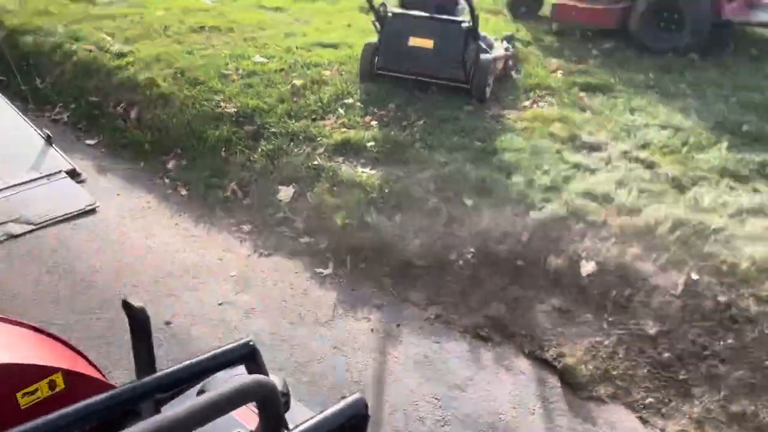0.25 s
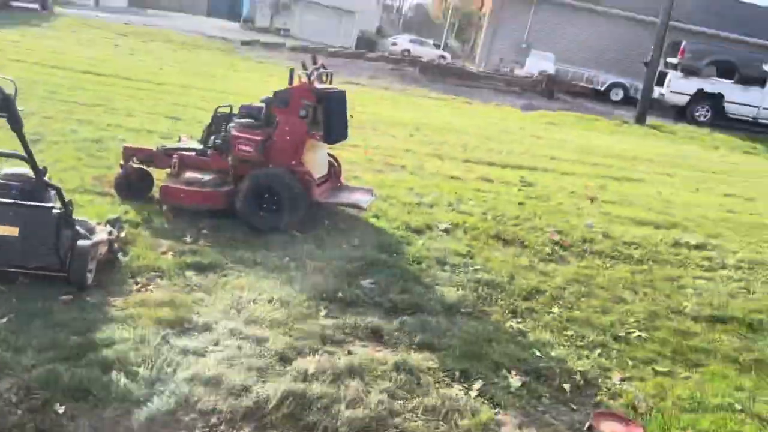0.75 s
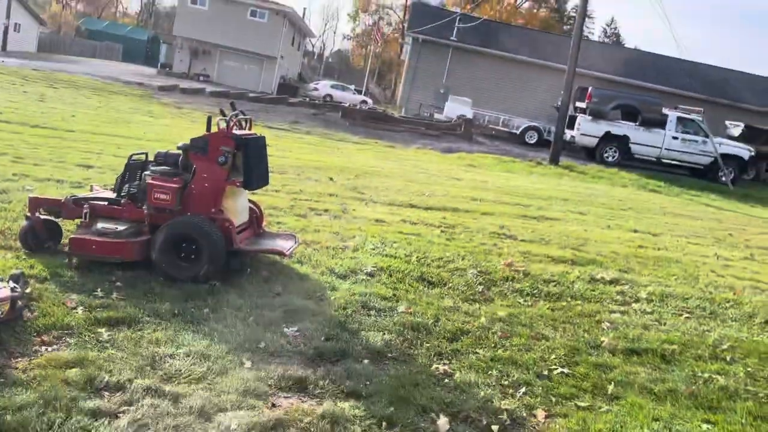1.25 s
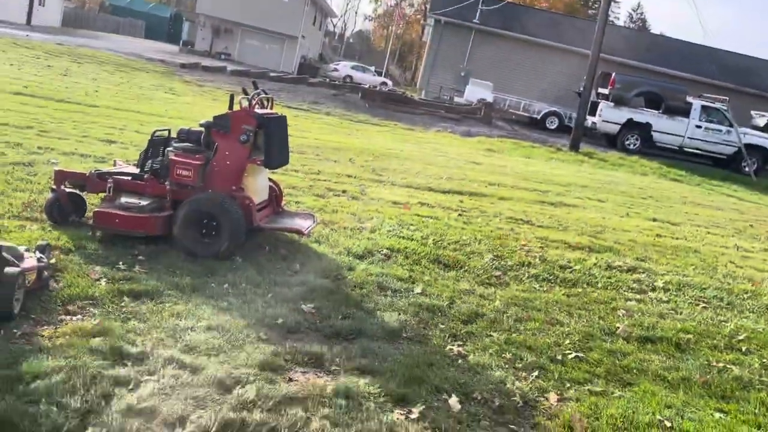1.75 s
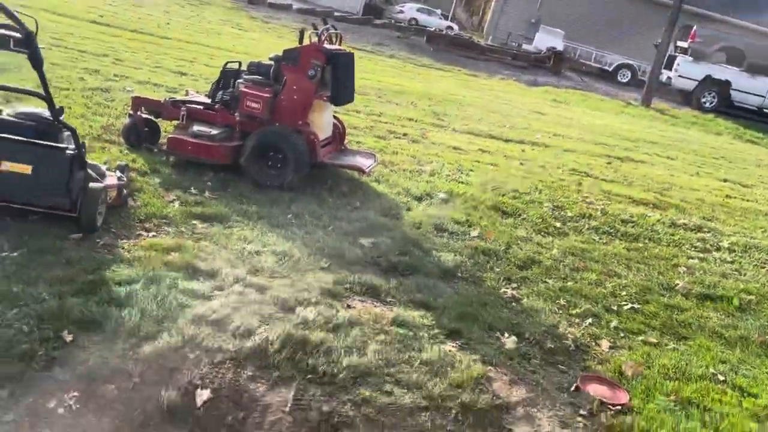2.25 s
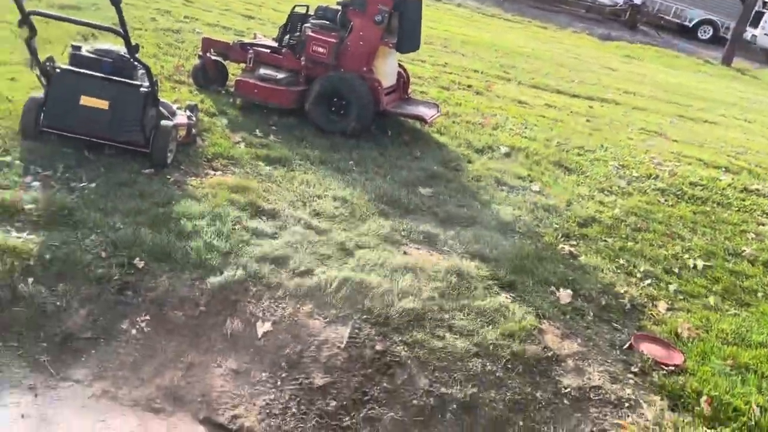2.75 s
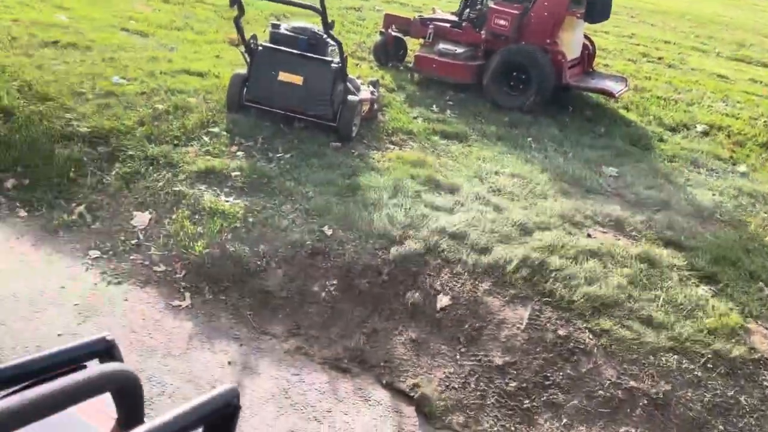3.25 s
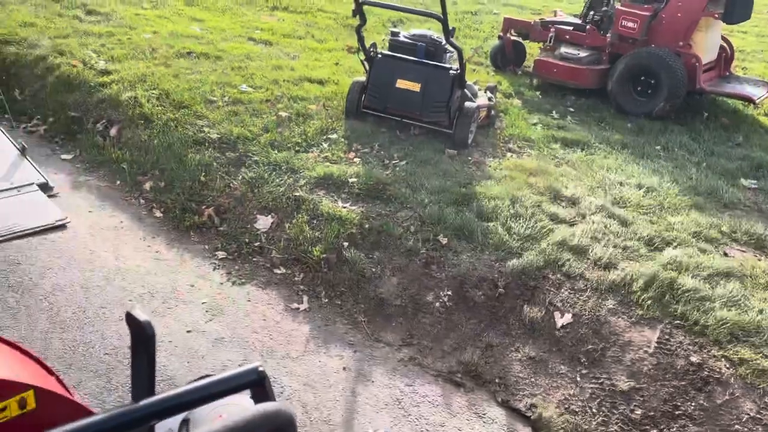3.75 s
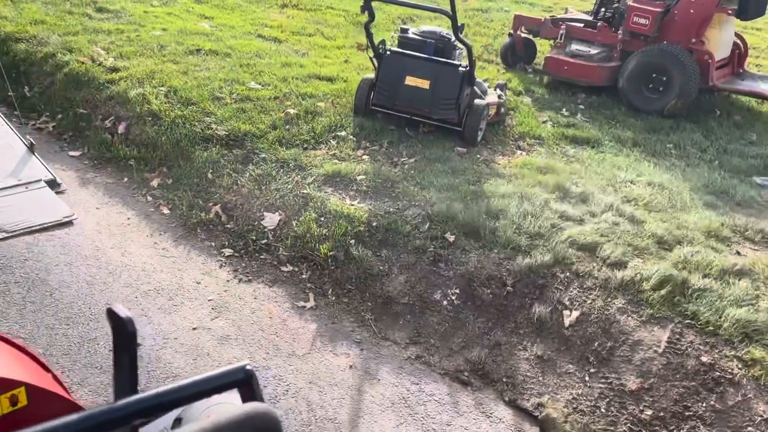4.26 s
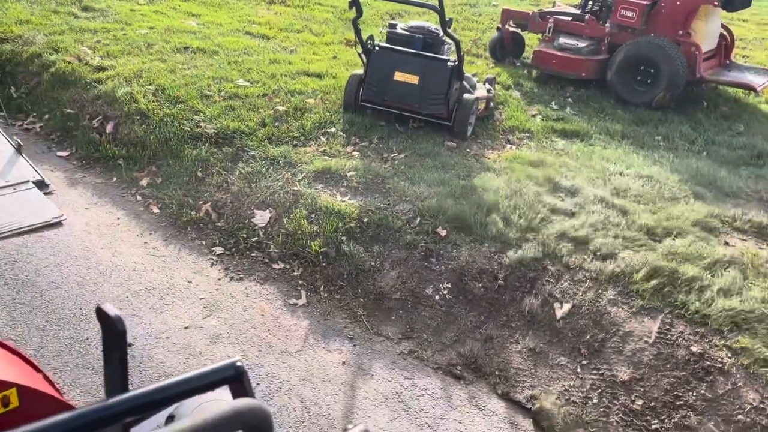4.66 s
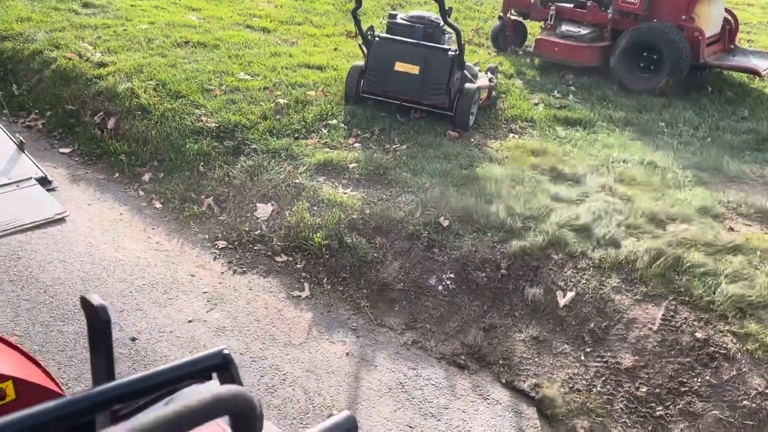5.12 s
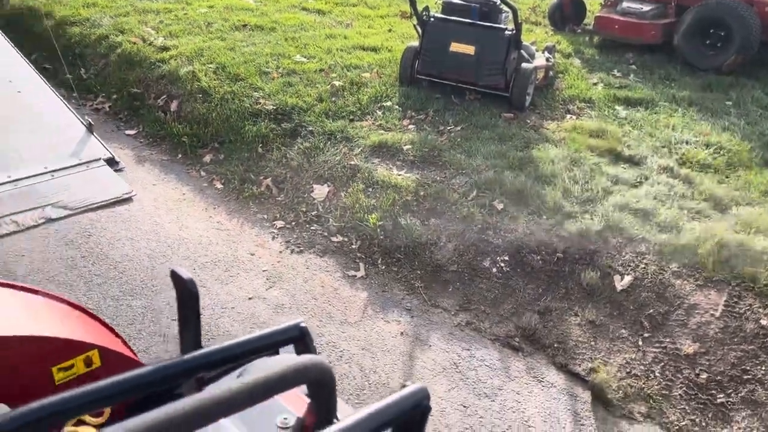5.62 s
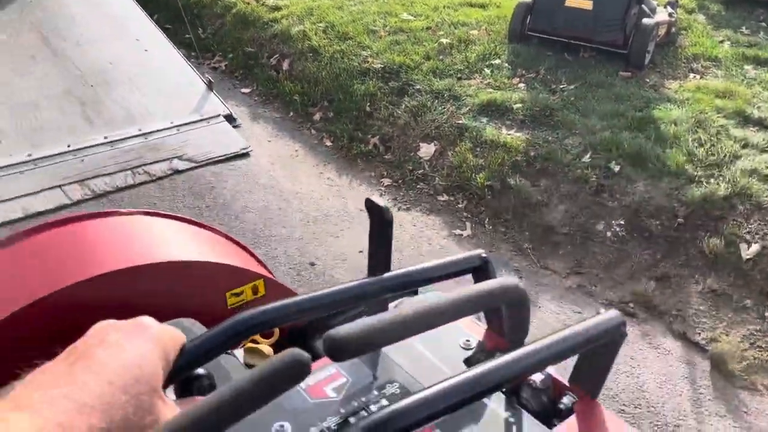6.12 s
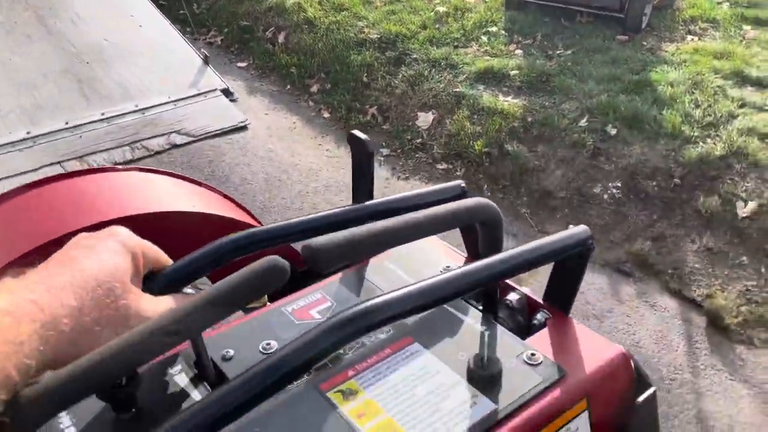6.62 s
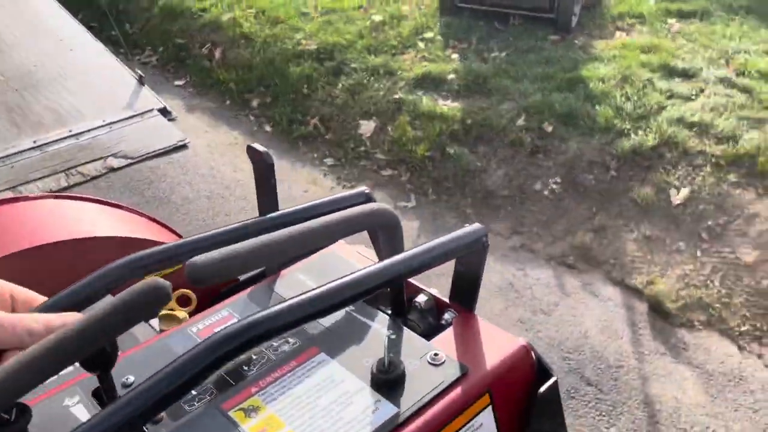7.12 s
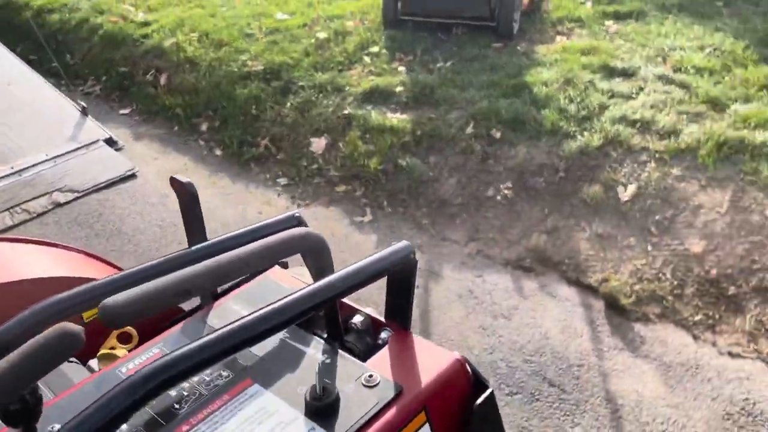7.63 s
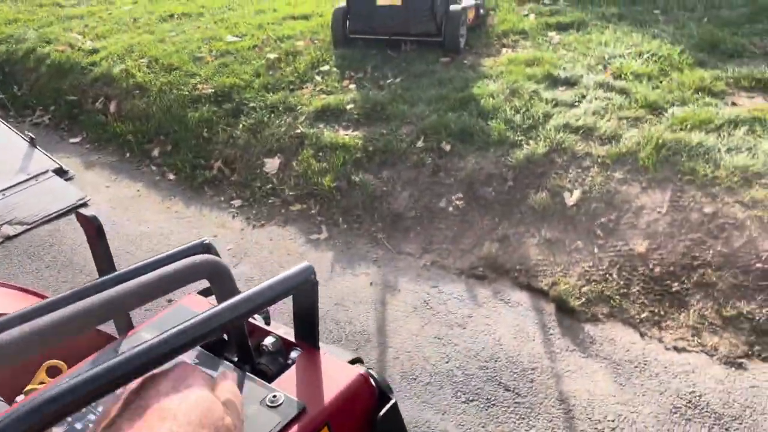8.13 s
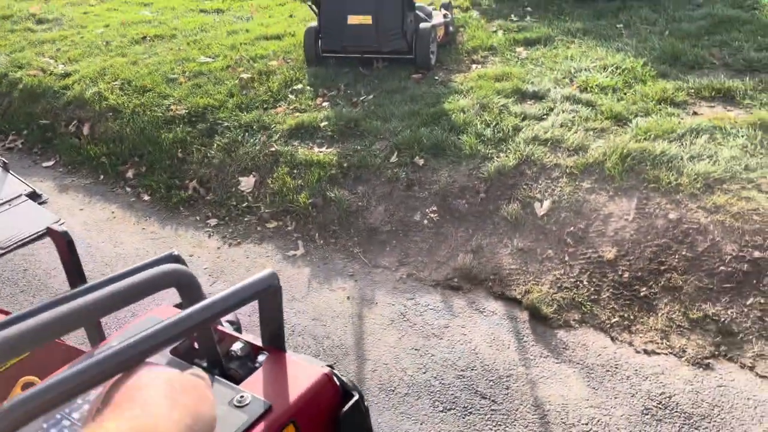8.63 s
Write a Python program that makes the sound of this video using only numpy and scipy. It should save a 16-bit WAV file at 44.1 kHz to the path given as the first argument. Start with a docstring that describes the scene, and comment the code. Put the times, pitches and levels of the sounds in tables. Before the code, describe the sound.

Close by outdoors, a large engine-driven blower throbs with rushing air and fan whine, briefly races brighter, then winds down lower and quieter.

```python
"""Rushing air and a throbbing exhaust come first, with the whine of a six-blade fan: a stand-on leaf blower
with a V-twin petrol engine on a driveway, heard from the driver's place by a two-port microphone.
The fan is a stack of sines that flare in housing resonances; exhaust lines and hum are sines, while muffler
puffs, air, jet and valve ticks are coloured noise, all timed by one crankshaft. After five seconds the load
eases: the fan speeds up and its tone swells; then the throttle is pulled back and the pitch sinks."""
import sys
import numpy as np
from scipy import signal
from scipy.fft import rfft, irfft
from scipy.io import wavfile
from scipy.ndimage import uniform_filter1d

SR = 44100
rng = np.random.default_rng(int(sys.argv[2]) if len(sys.argv) > 2 else 0)


def generate_wav(signal):
    """Clip the signal to [-1, 1] and save it as 16-bit WAV at the path in sys.argv[1]."""
    frames = np.transpose(np.atleast_2d(signal))
    scaled = np.clip(frames, -1, 1) * 32767
    pcm = np.round(scaled).astype(np.int16)
    wavfile.write(sys.argv[1], SR, pcm)


N = 391608
TIME = np.arange(N) / SR
BINS = np.fft.rfftfreq(N, 1 / SR)
BLADES = 6
VEE = 3 / 8  # share of the four-stroke cycle between the two cylinders

# blade-pass tone: [t/s, level/dB]
TONE_LEVEL = [(0, -24.5), (0.8, -31), (3.5, -21), (4.75, -29), (5, -15.5), (5.25, -10), (5.85, -13.5),
              (6.3, -12), (6.85, -15.0), (7.15, -23.5), (7.55, -23), (7.75, -18.5), (8.1, -21), (8.88, -19)]
# lean of that tone before it reaches the ports: [t/s, left minus right level/dB]
TONE_LEAN = [(0, 3), (2.9, 6), (3.4, 4), (4.5, 8), (5.1, 0.5), (8.88, -1)]
# the fan's octave: [t/s, level/dB]
OCTAVE_LEVEL = [(0, -26.5), (0.9, -46), (2.7, -35), (3.3, -26.5), (5.2, -25), (5.55, -57), (6.3, -35.5),
                (6.8, -37), (6.97, -28), (7.12, -47), (8.3, -37.5), (8.88, -38)]
# whine above the octave, before harmonic balance and housing: [t/s, level/dB]
WHINE_LEVEL = [(0.0, -37.5), (0.8, -41), (1.8, -39.1), (2.4, -33), (4.0, -34.5), (4.8, -37.5), (5.0, -33.5),
               (5.1, -27.5), (5.4, -29), (5.48, -25.5), (5.72, -25.2), (5.8, -32.5), (6.3, -33.5),
               (6.72, -34.5), (6.88, -34), (7.12, -33), (7.3, -44), (7.8, -41), (8.3, -42), (8.88, -39.5)]
# how the machine is running: [t/s, stage: 0 pulling, 1 racing, 2 running down, 3 idling]
RUNNING_STAGE = [(4.95, 0), (5.15, 1), (6.67, 1), (6.79, 2), (7.2, 2), (7.4, 3)]
# balance of the blades' harmonics as the airflow changes:
# [harmonic number, level/dB pulling, level/dB racing, level/dB running down, level/dB idling]
HARMONIC_BALANCE = [(3, 12, -0.5, 0.5, 13), (4, -19, -5.5, -5.5, 7.5), (5, 2, 2, 4.5, -1),
                    (6, 1, 0.5, 5, 4), (7, 0.5, 1, -4, 8), (8, -2, -1.5, -4, -1), (9, -2.5, -1.5, -3, -1.5),
                    (10, -0.5, -4.5, -0.5, 1), (11, -3.5, 0, -2, -2), (12, 0, 0, -3, -1.5),
                    (13, 2, 2.5, -4, 2), (14, 2, 1, -1, -4), (15, -7.5, 2, -2, -4), (16, -10, -3, -5, -8)]
# how deeply the upper harmonics come and go: [stage, depth/dB]
FADING_DEPTH = [(0, 1.2), (1, 1.5), (2, 2), (3, 3.8)]


def fan(cycle):
    """Blades chop the air at the housing lip; turbulence roughens harmonics that flare in the housing."""
    flutter, fuzz = 0.065, 0.16  # shares of the tone's level; of the harmonics' level and phase (rad)
    scatter = 0.29  # phase drift, opposite at the two ports (rad)
    angle = 2 * np.pi * 2 * BLADES * cycle
    blade_hz = BLADES * crank_speed()

    lean = amp(np.array([[.5], [-.5]]) * follow(TONE_LEAN))
    lean = lean / np.sqrt((lean ** 2).mean(0))  # leaning keeps the power
    tone = amp(follow(TONE_LEVEL)) * (1 + flutter * drift(rate_hz=35)) * np.cos(angle)
    out = tone * lean

    whine_db = follow(WHINE_LEVEL)
    stage = follow(RUNNING_STAGE)
    wander_db = np.interp(stage, *np.transpose(FADING_DEPTH))
    heights = [amp(follow(OCTAVE_LEVEL))]
    for k, *stage_db in HARMONIC_BALANCE:
        db = whine_db + np.interp(stage, np.arange(len(stage_db)), stage_db)
        depth_db = wander_db * min(k / 10, 1)  # the low harmonics are the steadiest
        fading = amp(depth_db * (drift(rate_hz=13) - 1 / 2))
        heights.append(amp(db) * housing(k * blade_hz) * fading)

    for k, height in enumerate(heights, 2):
        phase = k * angle + 2 * np.pi * rng.random() + fuzz * drift(rate_hz=27)
        spread = scatter * drift(rate_hz=3.9) * np.array([[1], [-1]])
        out += height * (1 + fuzz * drift(rate_hz=19)) * np.cos(phase + spread)
    return np.sqrt(2) * out


# narrow resonances of the fan housing: [f/Hz, width/Hz, level/dB]
HOUSING_MODES = [(829, 25, -7.5), (892, 13, 2), (1063, 18, -4), (1131, 54, 0), (1343, 68, 5.5),
                 (1434, 10, -1.5), (1510, 62, -0.5), (1678, 68, -3), (1776, 15, -0.5), (1795, 35, -11),
                 (1870, 15, -16), (2087, 57, -2), (2152, 18, -2.5), (2200, 200, -9.5), (2435, 16, -3.5),
                 (2634, 76, -7.5), (2738, 44, -5), (2866, 42, -2), (3100, 85, -15), (3400, 85, -12),
                 (3610, 80, -14.5), (3770, 38, -12), (4150, 100, -17), (4290, 60, -23), (4570, 19, -18),
                 (4940, 40, -19.5), (5287, 330, -31), (5630, 43, -19.5)]


def housing(hz):
    """Resonances add their powers; gives the gain at the frequencies hz."""
    grid = np.arange(0, SR / 2, 2)
    power = sum(amp(db) ** 2 / (1 + (2 * (grid - f) / width) ** 2) for f, width, db in HOUSING_MODES)
    return np.interp(hz, grid, np.sqrt(power))


# exhaust lines, relative to the exhaust level:
# [multiple of the cycle rate, level/dB pulling, level/dB running light, level/dB throttle shut]
FIRING_LINES = [(3, -15, -22, -5.5), (4, -21, -33, -14), (5, -13.5, -5.5, -21.5), (6, -6, -18.5, -13),
                (7, -7.5, -18.5, -13.5), (8, -7.5, -11.5, -7.5), (9, -15, -22, -9), (10, -16, -23, -12),
                (11, -25.5, -15, -23), (13, -45, -21.5, -24), (14, -40, -23.5, -24)]
# colour of the muffler noise: [f/Hz, relative level/dB per Hz]
MUFFLER_COLOUR = [(20, -40), (45, -18.5), (100, -7.5), (125, -7), (160, -2.5), (215, 3.5), (260, 2.5),
                  (305, -4), (375, -1.5), (440, -16), (700, -43)]
# how exhaust and hum follow the roar:
# [level/dB, dB per dB of roar, dB added running light, dB added throttle shut]
EXHAUST_FOLLOWS = (-19.5, 0.99, 0.05, 1)
HUM_FOLLOWS = (-26.5, 1, 0.5, -7.5)
# the hum fades as the crankshaft slows: [speed/(turns/s), added level/dB]
HUM_FADE = [(46, -4.5), (55, -0.5)]


def exhaust(cycle):
    """Two unevenly spaced firings a cycle give lines and puffs of muffler noise; each crank turn hums."""
    uneven, hum_waver = 0.11, 0.053  # shares of the level that wander
    far_cylinder = 0.68  # strength of the weaker cylinder in the lines
    smear = 0.73  # random phase offset of each line (rad, rms)
    throb, throb_width, second = 0.66, 0.15, 0.13  # puff height, width (cycles), share of the second puff
    load = follow(ENGINE_LOAD)
    pulling, shut = np.clip(load, 0, 1), np.clip(-load, 0, 1)

    strength, lines = 1 + uneven * drift(rate_hz=42), np.zeros(N)
    for k, pulling_db, light_db, shut_db in FIRING_LINES:
        # the lag between the cylinders sets the phase of their sum
        pair = np.angle(1 + far_cylinder * np.exp(2j * np.pi * k * VEE))
        db = light_db + pulling * (pulling_db - light_db) + shut * (shut_db - light_db)
        height = amp(db) * (strength + uneven * drift(rate_hz=2.6))
        lines += height * np.cos(2 * np.pi * k * cycle + pair + smear * rng.standard_normal())

    pair_of_puffs = burst(cycle, 0, throb_width) + second * burst(cycle, -VEE, throb_width)
    roar = amp(-2.5) * unit(1 + throb * pair_of_puffs) * noise(MUFFLER_COLOUR)

    hum_db = level(HUM_FOLLOWS) + np.interp(crank_speed(), *np.transpose(HUM_FADE))
    hum = amp(hum_db) * (1 + hum_waver * drift(rate_hz=14)) * np.cos(2 * np.pi * 2 * cycle)
    return amp(level(EXHAUST_FOLLOWS)) * (np.sqrt(2) * lines + roar) + np.sqrt(2) * hum


def burst(cycle, at, width):
    """A smooth bump once in every engine cycle."""
    return np.exp(-.5 * (((cycle - at + .5) % 1 - .5) / width) ** 2)


# colours of the air in the housing and at the nozzle: [f/Hz, relative level/dB per Hz]
RUSH_COLOUR = [(200, -17.5), (420, -4.5), (520, -0.5), (620, 1), (760, 0), (1050, -3.5), (1280, -0.5),
               (1650, -10), (2000, -12.5), (3000, -37.5)]
HISS_COLOUR = [(1000, -34), (1600, 3.5), (1950, 0.5), (2350, 1), (2700, -2), (3100, -4), (3550, -5),
               (4300, -10), (5200, -11.5), (6200, -13), (7400, -16), (9000, -33), (12000, -51),
               (16000, -40)]
# how rush (before its trim) and hiss follow the roar:
# [level/dB, dB per dB of roar, dB added running light, dB added throttle shut]
RUSH_FOLLOWS = (-24, 1, 0, -0.5)
HISS_FOLLOWS = (-32, 1.15, 4.5, 3.5)


def air(cycle):
    """Turbulent air rushes through the housing and hisses out of the nozzle, chopped by the blades."""
    rush_trim_db, gust_db = 1.0, 1.23
    chop = 0.15  # depth of the blades' chopping, as a share
    with_whine = 0.13  # dB the hiss swells per dB of whine
    whine_db = follow(WHINE_LEVEL)
    swell_db = with_whine * (whine_db - whine_db.mean())
    blades = unit(1 + chop * np.cos(2 * np.pi * 2 * BLADES * cycle))
    rush_db = level(RUSH_FOLLOWS) + rush_trim_db + gust_db * drift(rate_hz=14)
    rush = amp(rush_db) * noise(RUSH_COLOUR)
    hiss_db = level(HISS_FOLLOWS) + swell_db + gust_db * drift(rate_hz=33)
    hiss = amp(hiss_db) * noise(HISS_COLOUR)
    return blades * (rush + hiss)


# colour of the jet at the nozzle: [f/Hz, relative level/dB per Hz]
JET_COLOUR = [(600, -28), (880, 8), (1080, -10.5), (1400, -22.5), (1750, -11.5), (1950, 2.5), (2400, 3.5),
              (2700, -2.5), (3100, -32)]
# how the jet follows the roar, with the microphone on the lawn:
# [level/dB, dB per dB of roar, dB added running light, dB added throttle shut]
JET_FOLLOWS = (-33.5, 1.4, -1.5, 5)


def jet(cycle):
    """The jet tears at the air in gusts, throbbing once a cycle, as the microphone turns to the lawn."""
    gust_db, throb = 0.5, .35  # gust depth (dB rms), throb depth (share)
    pulses = unit(1 + throb * np.cos(2 * np.pi * cycle))
    gain = amp(level(JET_FOLLOWS) + gust_db * drift(rate_hz=50))
    return follow(MIC_AIM) * pulses * gain * noise(JET_COLOUR)


# colour of the valve gear: [f/Hz, relative level/dB per Hz]
VALVE_COLOUR = [(1500, -17), (3200, -1.5), (4300, -5.5), (6000, -3.5), (7300, -1.5), (8600, 2),
                (9500, -1.5), (10700, -6), (12000, -6), (13300, -9.5), (14500, -5), (16000, -11.5)]
# valve gear before its trim: [t/s, level/dB]
VALVE_GEAR_LEVEL = [(0, -40.5), (0.85, -53), (1.7, -49), (2.3, -44), (3.4, -39), (5.6, -43), (5.85, -47.5),
                    (6.7, -46.5), (7.0, -70), (7.42, -77), (7.55, -54.5), (7.8, -47.5), (8.0, -47.5),
                    (8.4, -62), (8.88, -82)]


def valves(cycle):
    """Valve gear ticks sharply on one cylinder and rasps on the other, with a closing tap, over a sizzle."""
    trim_db, vary_db = 2.0, 1.1  # level trim; rms spread of tick sizes
    main, second, second_width = 4.1, 0.59, 0.048  # tick and rasp heights against the sizzle; width (cycles)
    closing, closing_at = 0.37, 0.22  # tap height, and its place in the cycle
    light_boost, second_boost = 1.9, 2.0  # gains reached at low speed
    number = np.floor(cycle + 1 / 2).astype(int)
    size = amp(vary_db * rng.standard_normal((2, 512)))[:, number % 512]
    idling = np.interp(crank_speed(), [46, 54], [1, 0])  # by turns per second
    slow = light_boost ** idling
    rasp = second * second_boost ** idling * burst(cycle, -VEE, second_width)
    tap = closing * knock(cycle, closing_at)
    ticks = main * size[0] * knock(cycle, 0) + size[1] * (rasp + tap)
    shape = unit(1 / slow + slow * ticks)  # at low speed the ticks stand out from the sizzle
    return amp(follow(VALVE_GEAR_LEVEL) + trim_db) * shape * noise(VALVE_COLOUR)


def knock(cycle, at):
    """A quick rise and a slower fall once in every engine cycle, peak 1."""
    rise, fall = .02, .06  # shares of the engine cycle
    since = (cycle - at + rise) % 1
    return np.minimum(since / rise, 1) * np.exp(-np.maximum(since - rise, 0) / fall)


# speed that throttle and load ask of the crankshaft: [t/s, speed/(turns/s)]
ASKED_SPEED = [(0, 55.35), (0.45, 55.35), (1.1, 55.654), (2.68, 55.657), (3.18, 55.99), (3.9, 55.87),
               (4.75, 56.24), (5.03, 56.53), (5.45, 59.684), (5.59, 59.918), (6.3, 58.495), (6.77, 58.987),
               (7.09, 51.312), (7.38, 45.963), (7.77, 43.773), (8.26, 48.228), (8.59, 47.212),
               (8.88, 41.647)]


def crank_speed():
    """Turns per second; the weight of fan and flywheel rounds off changes of speed."""
    inertia_s = .16
    return uniform_filter1d(follow(ASKED_SPEED), round(inertia_s * SR), mode="nearest")


def engine_cycle():
    """Count of four-stroke cycles, two crank turns each and never quite even."""
    wobble = 0.00091  # rms share of the speed
    tick_at_s = 7.941  # a moment at which the louder cylinder's valve ticks
    cycle = np.cumsum(crank_speed() * (1 + wobble * drift(rate_hz=10.1))) / SR / 2
    return cycle - np.interp(tick_at_s, TIME, cycle)


# the roar as the microphone moves about the machine and the engine eases: [t/s, level/dB]
ROAR_LEVEL = [(0, -3), (0.85, -7), (1.2, -4.5), (1.9, -3.5), (3.2, -0.5), (4.85, 0.34), (5.68, -4.5),
              (5.82, -6.5), (6.7, -7.5), (7.1, -11.5), (7.5, -14), (8.05, -10), (8.88, -12.5)]
# engine load: [t/s, load: 1 pulling, 0 running light, -1 throttle shut]
ENGINE_LOAD = [(0, 0.94), (5.1, 0.96), (5.7, -0.22), (6.7, 0.08), (6.9, -0.74), (7.25, -0.72),
               (7.5, -0.025), (8.35, -0.45), (8.65, -0.85), (8.88, -1.2)]


def level(law):
    """A layer's level in dB, from the roar and the engine load."""
    db, slope, light_db, shut_db = law
    load_db = np.interp(follow(ENGINE_LOAD), [-1, 0, 1], [shut_db, light_db, 0])
    return db + slope * follow(ROAR_LEVEL) + load_db


# how alike noise is at the two ports: [f/Hz, likeness 0-1]
NOISE_LIKENESS = [(50, 1), (300, 0.97), (700, 0.72), (1400, 0.71), (2000, 0.79), (2600, 0.94), (3300, 0.59),
                  (7300, 0.62), (7750, 1), (8700, 1), (9900, 0.2), (10700, 0.95), (12300, 0.92),
                  (13200, .45), (14000, 1)]


def noise(colour):
    """Coloured noise of rms 1 as it reaches the two ports, partly alike."""
    a, b = rfft(rng.standard_normal((2, N)))
    alike = at_hz(NOISE_LIKENESS, BINS)
    pair = np.array([a, alike * a + np.sqrt(1 - alike ** 2) * b])
    return unit(irfft(pair * amp(at_hz(colour, BINS)), N))


def drift(rate_hz):
    """Smooth chance of about rms 1, whose changes weaken above rate_hz."""
    count = 4096
    f = np.fft.rfftfreq(count, TIME[-1] / count)
    slow = irfft(rfft(rng.standard_normal(count)) / (1 + (f / rate_hz) ** 2))
    return np.interp(TIME, np.linspace(0, TIME[-1], count), unit(slow))


def amp(db):
    """Decibels to gain."""
    return 10 ** (np.asarray(db) / 20)


def unit(x):
    """Scales to rms 1."""
    return x / np.sqrt(np.mean(abs(x) ** 2) + 1e-20)


def follow(table):
    """Reads a time table sample by sample."""
    return np.interp(TIME, *np.transpose(table))


def at_hz(points, hz, axis=1):
    """Reads one column of a spectrum on a log-frequency axis."""
    columns = np.transpose(points)
    return np.interp(np.log(hz + 1), np.log(columns[0]), columns[axis])


def scene():
    """Fan, exhaust, air, jet and valves are all timed by one crankshaft."""
    cycle = engine_cycle()
    return fan(cycle) + exhaust(cycle) + air(cycle) + jet(cycle) + valves(cycle)


def ports(x, table):
    """The two microphone ports shift phase and level by frequency."""
    half = amp(at_hz(table, BINS, axis=2) / 2) * np.exp(.5j * at_hz(table, BINS))
    return irfft(rfft(x) * np.array([half, 1 / half]), N)


# where the microphone points: [t/s, aim: 0 down at the machine, 1 out over the lawn]
MIC_AIM = [(0, 0), (.5, 0.91), (2.9, 0.89), (3.4, 0.31), (4.9, 0.5), (5.6, 0.0058), (8.88, 0.37)]
# the two ports, aimed at the machine and at the lawn: [f/Hz, left lead/rad, left minus right level/dB]
MACHINE_PORTS = [(20, 0, -1.5), (350, 0.34, 2), (680, -0.5, 0.5), (1200, 0.68, -0.5), (1590, 1.4, -0.5),
                 (1794, 3.5, -5), (2240, 4.5, 3.5), (2850, 6.5, 0), (3380, 7, 1.5), (5300, 7, 5),
                 (6640, 5.5, -1.5), (7800, 3, 4.5), (8970, 3, 3.5), (10500, 0.5, -2), (12400, -1, 0.5),
                 (13900, -3, -0.5)]
LAWN_PORTS = [(20, 0, -0.5), (348, 0.68, 2), (680, 1.14, 4.5), (1070, 1.44, 2), (1390, 3, -2),
              (1746, 4, -9), (1890, 4.5, 1.5), (2510, 6.5, -3), (3560, 9, 2.5), (4570, 6, -0.5),
              (6180, 8.5, 0.5), (7400, 4, 0), (7860, 3.5, -3.5), (10400, 1, 0.5), (12500, 0.5, 0),
              (13850, -3, 0)]


def record(dry):
    """The microphone swings between machine and lawn; then the band limit."""
    edge_hz = 15800
    aim = follow(MIC_AIM)
    heard = (1 - aim) * ports(dry, MACHINE_PORTS) + aim * ports(dry, LAWN_PORTS)
    low_pass = signal.firwin(511, edge_hz, window=("kaiser", 9), fs=SR)
    return signal.oaconvolve(heard, low_pass[None], "same")


dry = scene()
out = record(dry)
generate_wav(out)
```